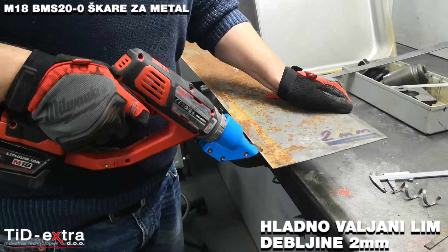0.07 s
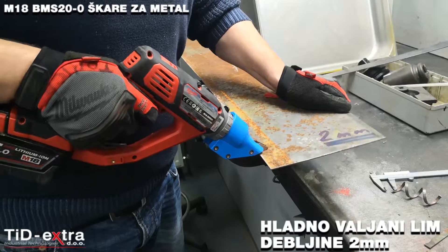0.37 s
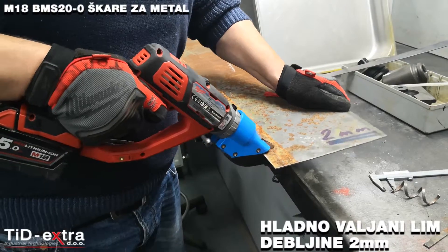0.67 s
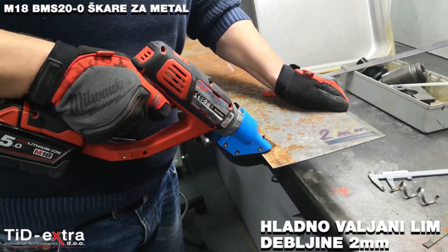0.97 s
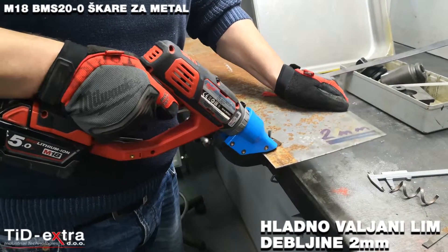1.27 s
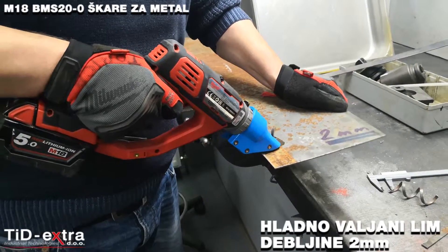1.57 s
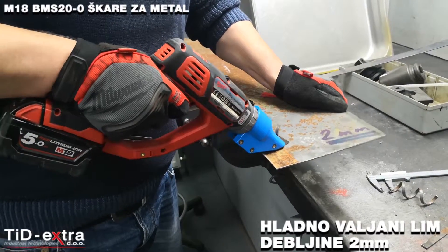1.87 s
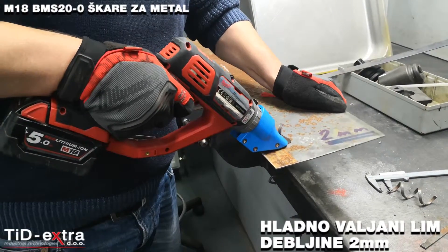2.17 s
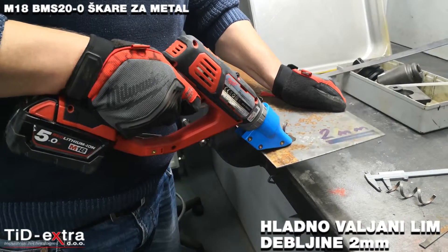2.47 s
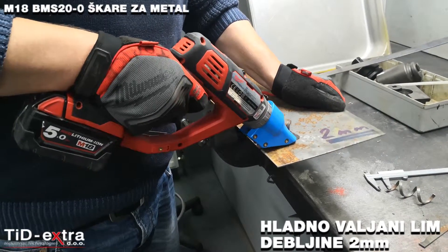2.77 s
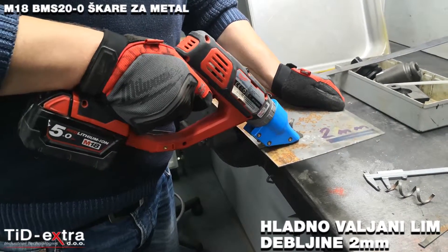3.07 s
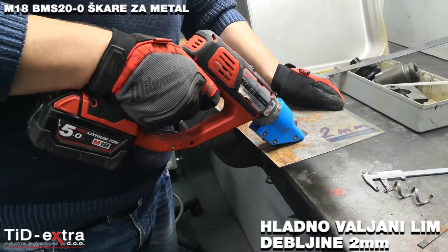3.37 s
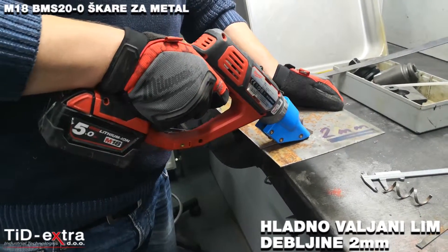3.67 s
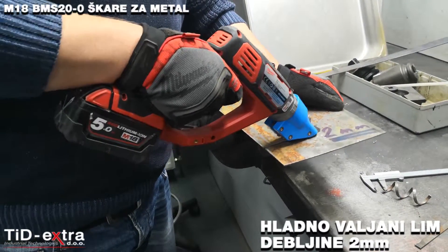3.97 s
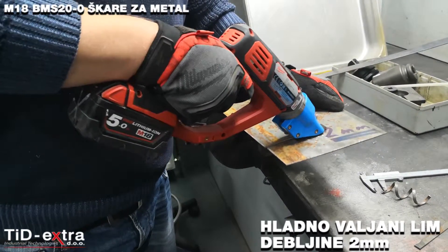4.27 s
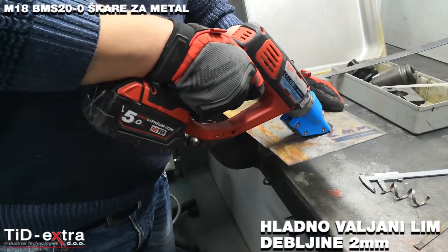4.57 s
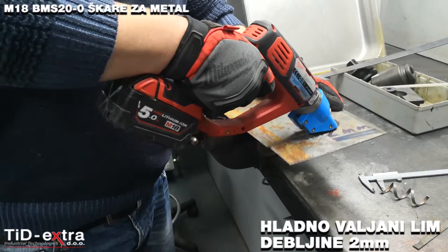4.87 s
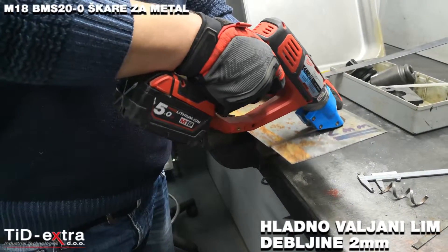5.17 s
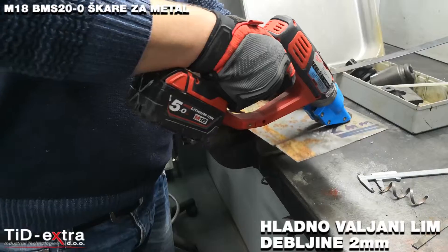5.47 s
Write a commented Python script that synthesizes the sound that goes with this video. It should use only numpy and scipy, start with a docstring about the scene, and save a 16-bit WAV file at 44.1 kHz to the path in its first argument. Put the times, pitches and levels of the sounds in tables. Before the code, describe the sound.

An electric shear chatters rapidly through sheet steel, its motor buzzing while the metal rings, scrapes and briefly squeaks.

```python
"""A cordless shear cuts a steel sheet on a workbench, biting about 37 times a second.
Each bite is an impulse: a chirp, a snap and a crunch that set the blade and the sheet's modes ringing.
Between bites the gears rattle and the cut edge grinds along the jaws; the bench hums in forced vibration.
Now and then a hard bite thumps or the binding steel squeaks. Near the end the tool leans on the sheet,
which growls and drones. The workshop adds a short reverberation."""
import sys
import numpy as np
from scipy import signal
from scipy.fft import rfft, irfft, next_fast_len
from scipy.io import wavfile
from scipy.ndimage import map_coordinates

SR = 44100
rng = np.random.default_rng(int(sys.argv[2]) if len(sys.argv) > 2 else 0)


def file_out(sig):
    """Save sig as 16-bit WAV at sys.argv[1]."""
    # one column per channel
    cols = np.atleast_2d(sig).T
    # limit, then scale
    lim = np.clip(cols, -1, 1)
    pcm = np.round(lim * 32767).astype(np.int16)
    wavfile.write(sys.argv[1], SR, pcm)


N = 243431

# the motor, once spun up, sags and recovers with the steel's resistance: (time [s], stroke rate [Hz])
STROKE_RATE = [(0.18, 35.57), (0.57, 37.98), (1.13, 38.3), (1.21, 37.07), (1.42, 38.5), (1.53, 37.52),
               (1.72, 38.67), (2.49, 37.49), (2.57, 38.13), (3.15, 38.72), (3.32, 35.06), (3.45, 37.09),
               (3.76, 38.03), (3.99, 37.12), (4.39, 37.88), (4.55, 36.59), (5.5, 36.84)]
# how hard the tool is pushed: (time [s], level [dB], emphasis of the bites [dB])
LOAD = [(.14, -20.5, -2.5), (.6, -19.5, 0), (1.4, -19, 1), (2.3, -19.5, 1), (2.65, -18.5, 2),
        (3.05, -19, 2), (3.55, -18.5, 3.5), (3.95, -18.5, 4.5), (4.4, -19.5, 1.5), (4.6, -19, 2),
        (5.15, -17.5, 0), (5.45, -19, 0)]
# the jaws bind and grind louder: (start [s], end [s], gain [dB])
BINDS = [(0.12, 0.173, 3.5), (3.677, 3.755, 2), (4.076, 4.105, 2), (4.236, 4.326, 1.2), (4.74, 4.948, 0.5),
         (5.097, 5.264, 0.8)]
# broad resonances of the cutting head: (frequency [Hz], bandwidth [Hz], gain [dB])
HEAD_MODES = [(1906, 800, 7), (3826, 310, 5), (4735, 440, 5.5), (5596, 630, 7.5), (7060, 930, 7.5)]
# modes of the sheet: (frequency [Hz], bandwidth [Hz], early level [dB], midway level [dB], late level [dB])
SHEET_MODES = [(624, 17, -0.5, -6, -16), (689, 5.7, -11, -10, 0), (813, 8.4, 1.5, -2, 1),
               (865.5, 15, -0.5, -2, -2), (1034, 25, -13, -21, -1), (1092, 15, -19, -11, 6),
               (1836, 13, -1.5, 2, 2.5), (1935, 22, 12, 13, -4), (2022, 14.4, 1, 9, 13),
               (2044, 26, 6, 12, -2.5), (2129, 16, -4, 8, 12.5), (2355, 64, -4, 6.5, -6),
               (2470, 64, 3.5, 3, -1), (2704, 17, 10.5, 6, 9.5), (3480, 150, -24, -1.5, 4),
               (3820, 26, 9, 10, -7), (5060, 42, -13, -4, -4)]
# the early, midway and late stages of the cut: (time [s])
CUT_STAGES = (1.4, 3.0, 4.4)
# resonances of the bench: (frequency [Hz], bandwidth [Hz], gain [dB])
BENCH_MODES = [(200.5, 16, 6), (272, 28, 3.5)]
# partials of the shaking tool: (multiple of the stroke rate) and (level [dB])
SHAKE_HARMONICS = (2, 3, 4)
SHAKE_LEVELS = (-41, -43, -45.5)
# swells of the shaking: (time [s], multiple of the stroke rate, half width [s], peak level [dB])
BUCKS = [(.32, 2, 0.059, -26.5), (0.545, 2, 0.081, -32), (0.825, 3, 0.071, -33), (1.107, 2, 0.052, -32.5),
         (2.72, 3, 0.16, -45), (3.208, 2, 0.089, -37), (3.407, 2, 0.081, -30), (3.58, 3, 0.085, -37),
         (3.95, 5, 0.39, -34.5), (4.648, 2, 0.079, -39), (5.11, 3, 0.11, -39)]
# strength of the chirp before each bite: (time [s], peak level [dB])
CHIRP_LEVELS = [(.14, -38), (.185, -24), (.23, -27), (.6, -24), (.85, -26), (1.6, -22), (2.9, -22),
                (3.12, -24), (3.3, -15.5), (3.6, -22), (3.8, -24), (4.4, -22), (4.75, -18), (5.15, -19.5),
                (5.45, -19.5)]
# partials of the struck blade: (frequency [Hz], relative level [dB])
BLADE_MODES = [(2050, -1.5), (3500, -12), (5000, 0), (7100, 0)]
# the blade rebounds in its guide: (delay after the snap [s], relative level [dB])
REBOUNDS = [(.0022, -9), (.007, -10), (.0115, -13)]
# the steel squeaks on the blade: (time [s], relative level [dB])
SQUEAKS = [(0.1217, -7.5), (0.1906, -6.5), (0.2756, -8.5), (1.57, -16), (2.409, -15.5), (2.595, -15),
           (2.648, -23), (2.674, -18), (2.805, -13), (2.856, -12), (2.881, -24), (3.275, -16), (3.656, -22),
           (3.6825, -17), (3.736, -18), (4.0811, -18), (4.781, -15)]
# hard bites, a low thump after which the level dips briefly: (time [s], thump level [dB], dip scale [dB])
HARD_BITES = [(0.2199, -17, 0), (0.248, -14, -0.5), (0.94, -16.5, 2), (1.121, -16, 0), (1.492, -10.5, 8.5),
              (1.519, -12.5, 3.5), (1.753, -14.5, 0.5), (1.937, -11, 3), (2.197, -14, 2),
              (2.251, -11.5, 0.5), (2.384, -12, 10), (2.464, -16, 2), (2.674, -18, 2.5), (3.014, -11, 1),
              (3.789, -13.5, 5.5), (3.897, -7.5, -0.5), (4.003, -17.5, 0.5), (4.109, -10, 11.5),
              (4.137, -12.5, -3), (4.348, -17, 4.5), (4.972, -19, 4.5), (5.137, -22, 2.5),
              (5.19, -15.5, 0.5), (5.299, -9, 4.5)]
# the binding steel squeals: (time [s], half width [s], frequency [Hz], peak level [dB])
SQUEALS = [(3.325, .05, 5080, -22), (3.738, .003, 4950, -10)]
# partials of the leaned-on sheet: (multiple of the stroke rate) and (level [dB])
DRONE_HARMONICS = (4, 5, 7, 8, 11, 22)
DRONE_LEVELS = (-41, -50, -39.5, -41.5, -48.5, -46)
# spectral envelopes of the sources: (frequency [Hz], relative spectral density [dB])
GEAR_SPECTRUM = [(100, -5.5), (300, -6.5), (500, -12.5), (900, -1.5), (1500, -4), (3000, 2.5), (4300, -2),
                 (6300, -3.5), (7800, 1), (8500, -12), (10000, -18), (11000, -13), (15000, -14)]
HUM_SPECTRUM = [(20, -22), (60, -5.5), (115, -3), (180, -0.5), (290, -6.5), (480, -21), (800, -10),
                (1400, -49), (3000, -100)]
RUMBLE_SPECTRUM = [(8, -18), (20, -9), (40, -6.5), (150, -3.5), (400, -13.5), (2000, -88.5)]
BITE_SPECTRUM = [(100, -11), (520, -20), (900, 4.5), (1500, 6), (3000, -4), (4200, 6.5), (4900, 12),
                 (6300, -2), (7800, 5), (8500, -13), (10000, -14), (11000, -3), (15000, -7)]
SNAP_SPECTRUM = [(100, -21), (500, -18.5), (900, -9), (1400, -3), (2000, 6.5), (2600, 1), (3400, -20.5),
                 (6000, -26.5), (15000, -32.5)]
SQUEAK_SPECTRUM = [(500, -17), (1800, 13), (3800, -4), (4900, 7), (6200, 9.5), (7300, 12.5), (8500, -3),
                   (15000, -52)]
GROWL_SPECTRUM = [(150, -22), (270, -6), (380, -9.5), (550, -3), (800, -3), (1150, 7), (1500, -15),
                  (2500, -14)]
# decay of the workshop: (frequency [Hz], reverberation time [s])
ROOM_T60 = [(200, 0.012), (2000, 0.32), (12000, 0.14)]
# width of the sound field: (frequency [Hz], side over mid [dB])
STEREO_WIDTH = [(50, -13), (110, -10), (200, -5), (380, 0), (700, 1), (1300, -2.5), (2400, -1), (4400, 0)]
# balance between the channels: (time [s], left over right [dB])
BALANCE = [(0, 0.5), (2, 0.8), (2.8, -0.5), (5.5, -0.5)]

SWITCH_ON_S, SPIN_UP_S, FIRST_BITE_S = 0.068, 0.108, 0.122
BITE_SIDE_DB, RATTLE_SIDE_DB = -4, 1  # bites arrive straight from the blade, the rattle from all around
TIME = np.arange(N) / SR
FFT_SIZE = 2 * next_fast_len(N // 2 + SR // 4)


def amp(db):
    """Amplitude ratio of a level in decibels."""
    return 10 ** (np.asarray(db) / 20)


def unit(x):
    """Normalisation to an rms of 1."""
    return x / np.sqrt(np.mean(x ** 2) + 1e-20)


def along(points, hz):
    """Interpolation of (frequency [Hz], value) points on a logarithmic axis."""
    f, v = np.transpose(points)
    return np.interp(np.log(hz + 1), np.log(f + 1), v)


def curves(rows):
    """Linear interpolation, sample by sample, of each column after the time."""
    times, *columns = np.transpose(rows)
    return [np.interp(TIME, times, column) for column in columns]


def wobble(rate):
    """Smooth random modulation with rate knots a second."""
    return map_coordinates(rng.standard_normal(int(N * rate / SR) + 4), [np.arange(N) * rate / SR])


def bell(offset, width):
    """Gaussian envelope, down to 1/e at an offset of one width."""
    return np.exp(-(offset / width) ** 2)


def held(start, end, edge_s):
    """Trapezoidal gate, open from start to end."""
    return np.clip(np.minimum(TIME - start, end - TIME) / edge_s + .5, 0, 1)


def switched_on(rise_s):
    """Linear ramp from 0 to 1, beginning at switch-on."""
    return np.clip((TIME - SWITCH_ON_S) / rise_s, 0, 1)


def filtered(x, response):
    """Linear filtering: the spectrum of x times a complex frequency response."""
    return irfft(rfft(x, FFT_SIZE) * response(np.fft.rfftfreq(FFT_SIZE, 1 / SR)), FFT_SIZE)[..., :N]


def band(x, gains):
    """Zero-phase filtering by (frequency [Hz], linear gain) points."""
    return filtered(x, lambda hz: along(gains, hz))


def coloured(x, spectrum, resonances=()):
    """Minimum-phase filtering by a spectral envelope with resonance peaks on top."""
    def response(hz):
        peaks_db = sum(db / (1 + (2 * (hz - centre) / width) ** 2) for centre, width, db in resonances)
        cepstrum = irfft(np.log(amp(along(spectrum, hz) + peaks_db)))
        half = len(cepstrum) // 2
        return np.exp(rfft(cepstrum * np.r_[1, np.full(half - 1, 2), np.zeros(half)]))
    return filtered(x, response)


def whitened(bursts):
    """Whitening: each burst keeps its phases and takes a flat magnitude spectrum."""
    return irfft(np.exp(1j * np.angle(rfft(bursts))), bursts.shape[-1])


def stereo(pair, side_db=0, echoed=0.51):
    """Decorrelation: reflections off the bench top widen the treble; the bass stays nearly central."""
    t = np.arange(SR // 50) / SR
    reflections = whitened(rng.standard_normal(len(t)) * np.exp(-t / 0.0014))
    reflections *= np.hanning(2 * len(t))[len(t):]
    echo = signal.fftconvolve(pair[0], reflections / np.linalg.norm(reflections))[:N]
    wide = np.sqrt(1 - echoed) * pair[1] + np.sqrt(echoed) * echo
    mid = filtered(pair[0], lambda hz: 1 / np.hypot(1, amp(along(STEREO_WIDTH, hz))))
    side = amp(side_db) * filtered(wide, lambda hz: 1 / np.hypot(1, amp(-along(STEREO_WIDTH, hz))))
    return unit(np.array([mid + side, mid - side]))


def strikes(times, sizes, length_s, alike):
    """Impacts as two channels of broadband bursts; in the first, the share alike is a pure impulse."""
    t = np.arange(SR // 100) / SR
    grain = np.sqrt([[[1 - alike]], [[1]]]) * rng.standard_normal((2, len(times), len(t)))
    envelope = t / length_s * np.exp(-t / length_s)
    bursts = grain * envelope / np.linalg.norm(envelope)
    bursts[0, :, envelope.argmax()] += np.sqrt(alike)
    bursts = whitened(bursts) * bell(t, 10 * length_s)
    starts = np.round(np.clip(times, 0, None) * SR).astype(int)
    samples = (starts[:, None] + np.arange(len(t))).ravel()
    return np.array([np.bincount(samples, (c * sizes[:, None]).ravel(), N)[:N] for c in bursts])


def roughness(turns, drift, fresh, size=1200):
    """Quasi-periodic noise: a drifting profile recurs each stroke; the share fresh is always new."""
    profiles = rng.standard_normal((2, 64, size))
    place = [TIME * drift, turns % 1 * size]
    recurring = unit(np.array([map_coordinates(p, place, order=1, mode="grid-wrap") for p in profiles]))
    return np.sqrt(1 - fresh) * recurring + np.sqrt(fresh) * rng.standard_normal((2, N))


def crank():
    """Phase is the integral of rate: blade strokes counted from the first bite."""
    turns = np.cumsum(curves(STROKE_RATE)[0] * switched_on(SPIN_UP_S)) / SR
    return turns - turns[round(FIRST_BITE_S * SR)]


def bite_times(turns):
    """One bite falls on each whole turn of the crank."""
    return np.interp(np.arange(int(turns[-1]) + 1), turns, TIME)


def gear_teeth(turns, count, uneven_db, scatter_db, jitter_s):
    """Periodic impacts: the teeth knock in an uneven pattern that recurs with every stroke."""
    strokes = np.arange(-1, int(turns[-1]) + 1)[:, None]
    place = (np.arange(count) + rng.random(count)) / count
    times = np.interp((strokes + place).ravel(), turns, TIME, right=N / SR)
    tooth_db = uneven_db * rng.standard_normal(count)
    sizes = amp(tooth_db + scatter_db * rng.standard_normal((len(strokes), count))).ravel()
    times += jitter_s * rng.standard_normal(len(times))
    return unit(strikes(times, sizes, length_s=.0003, alike=0.35))


def grinding(turns, rough_db, swing_db):
    """Sliding friction: the cut edge scrapes along the jaws, most in the first half of each stroke."""
    drag_db = swing_db * np.sin(2 * np.pi * turns) + rough_db * wobble(900)
    return unit(roughness(turns, drift=3.055, fresh=0.89) * amp(drag_db))


def hush(turns, depth_db, lead_strokes, width_strokes):
    """Amplitude modulation: the rattle eases while the blade presses on the steel before each bite."""
    offset = (turns + lead_strokes + .5) % 1 - .5
    return amp(-depth_db * bell(offset, width_strokes))


def sheet_ring(force):
    """Modal superposition: the sheet's damped modes trade strength as the cut grows."""
    f = np.fft.rfftfreq(FFT_SIZE, 1 / SR)
    modes = np.array([(-1) ** k * 1j * f * width / (centre ** 2 - f ** 2 + 1j * f * width)
                      for k, (centre, width, *_) in enumerate(SHEET_MODES)])
    ring = 0
    for levels_db, stage in zip(np.transpose(SHEET_MODES)[2:], np.eye(len(CUT_STAGES))):
        share = np.interp(TIME, CUT_STAGES, stage)
        ring = ring + share * filtered(force, lambda hz: amp(levels_db) @ modes)
    return unit(ring)


def bench(turns):
    """Forced vibration: tool and bench shake at harmonics of the stroke rate, over a dull rumble."""
    force = roughness(turns, drift=4, fresh=.5)
    hum_db = -36.5 + 0.3 * TIME + 1.3 * wobble(16)  # rises as the jaws travel onto the bench
    hum = amp(hum_db) * stereo(coloured(force, HUM_SPECTRUM, BENCH_MODES))
    shake = sum(amp(db + 0.88 * wobble(5.75)) * np.sin(2 * np.pi * k * turns + 0.21 * wobble(7))
                for k, db in zip(SHAKE_HARMONICS, SHAKE_LEVELS))
    bucks = sum(amp(db) * bell(TIME - at, width) * np.sin(2 * np.pi * k * turns)
                for at, k, width, db in BUCKS)
    rumble = amp(-37) * stereo(coloured(rng.standard_normal((2, N)), RUMBLE_SPECTRUM))
    return hum + shake + bucks + rumble


def workshop(x):
    """Reverberation: reflections from the walls decay exponentially, each frequency at its own rate."""
    hz, t, noise = signal.stft(rng.standard_normal((2, SR // 2)), SR, nperseg=256)
    tail = signal.istft(noise * amp(-60 * t / along(ROOM_T60, hz)[:, None]), SR, nperseg=256)[1]
    tail = np.pad(tail / np.linalg.norm(tail[0]), ((0, 0), (SR // 200, 0)))  # 5 ms of travel
    return signal.fftconvolve(x, tail, axes=1)[:, :N]


def gear_whirr(turns, harmonic, at_s, width_s):
    """Swept excitation: at spin-up the gear-mesh tone rises briefly through the head's resonances."""
    swell = amp(-22.5) * bell(TIME - at_s, width_s)
    mesh = np.sin(2 * np.pi * harmonic * turns + 1.3 * wobble(700))
    return coloured(swell * mesh, GEAR_SPECTRUM, HEAD_MODES)


def chirps(turns, pitch_hz, fall_hz_per_s, lead_s, width_s):
    """Friction tone: before each bite the blade slides under rising pressure, and the pitch falls."""
    stroke = np.clip(np.round(turns).astype(int), 0, int(turns[-1]))
    size, detune, early, spread = rng.standard_normal((int(turns[-1]) + 1, 4))[stroke].T
    t = TIME - bite_times(turns)[stroke] + lead_s + .0009 * early
    phase = 2 * np.pi * t * (pitch_hz + 110 * detune - fall_hz_per_s * t / 2) + .45 * wobble(700)
    swell = amp(curves(CHIRP_LEVELS)[0] + 1.3 * size) * bell(t, width_s)
    return swell * np.sin(phase + spread * np.array([[.7], [-.7]]))


def bites(turns, scatter_db, lead_s):
    """Shear fracture: once a stroke the steel gives way in a brief crunch."""
    times = bite_times(turns)
    sizes = amp(scatter_db * rng.standard_normal(len(times)))
    return unit(strikes(times - lead_s, sizes, length_s=0.00048, alike=0.15))


def blade_ring(turns, decay_s, scatter_db, detune):
    """Damped free vibration: every bite sets the blade ringing for a few milliseconds."""
    t = np.arange(SR // 100) / SR
    starts = np.searchsorted(turns, np.arange(int(turns[-1]) + 1)) - round(decay_s * SR)
    ring = 0
    for hz, db in BLADE_MODES:
        size, pitch, phase = rng.standard_normal((len(starts), 3)).T[:, :, None]
        cycles = hz * (1 + detune * pitch) * t + phase / 10
        ring = ring + amp(db + scatter_db * size) * np.sin(2 * np.pi * cycles)
    ring = ring * t / decay_s * np.exp(-t / decay_s)
    samples = (starts[:, None] + np.arange(len(t))).ravel()
    return unit(np.bincount(samples, ring.ravel(), N)[:N])


def snaps(turns, lean, scatter_db, jitter_s):
    """Impact transients: the steel snaps, the blade rebounds, and a leaned-on sheet slaps the jaws."""
    times = bite_times(turns)
    hard = np.abs(times[:, None] - np.array(HARD_BITES)[:, 0]).min(axis=1) < .01
    sizes = amp(scatter_db * rng.standard_normal(len(times)) + 3.5 * hard)

    def tick(delay_s):
        return strikes(times - .0005 + delay_s, sizes, length_s=.00016, alike=.92)

    def loose_tick(delay_s):
        return tick(delay_s + jitter_s * rng.standard_normal(len(times)))

    rebounds = sum(amp(db) * loose_tick(delay_s) for delay_s, db in REBOUNDS)
    snap = tick(0)
    slap = amp(-5) * lean * loose_tick(delay_s=0.011)
    return stereo(coloured(snap + rebounds + slap, SNAP_SPECTRUM), BITE_SIDE_DB)


def squeaks(decay_s, pitch_hz, tone_db):
    """Stick-slip friction of steel on the blade: a bright crunch with a brief tone."""
    t = np.arange(SR // 40) / SR
    envelope = t / decay_s * np.exp(1 - t / decay_s)
    slips = np.zeros((2, N))
    for at, db in SQUEAKS:
        hz = pitch_hz * (1 + 0.086 * rng.standard_normal())
        tone = amp(tone_db) * np.sin(2 * np.pi * (hz * t + rng.random((2, 1))))
        start = round(at * SR)
        slips[:, start:start + len(t)] += amp(db) * envelope * (rng.standard_normal((2, len(t))) + tone)
    return coloured(slips, SQUEAK_SPECTRUM)


def hard_bites(rise_s, recovery_s):
    """Low-frequency transient: a thump, after which the level dips briefly. Gives (thumps, dip [dB])."""
    thumps, dip_db = np.zeros(N), np.zeros(N)
    for at, db, drop_db in HARD_BITES:
        t = np.arange(N - round(at * SR)) / SR
        thumps[-len(t):] += rng.choice([-1, 1]) * amp(db) * t / rise_s * np.exp(1 - t / rise_s)
        dip_db[-len(t):] -= drop_db * (1 - np.exp(-t / rise_s)) * np.exp(-t / recovery_s)
    return filtered(thumps, lambda hz: 1j * hz / (22 + 1j * hz)), dip_db  # high-pass at 22 Hz


def squeals(waver_rad):
    """Friction-excited vibration: the binding steel sounds a brief tone of unsteady pitch."""
    phase = waver_rad * wobble(200) + np.array([[.5], [-.5]])
    return sum(amp(db) * bell(TIME - at, width) * np.sin(2 * np.pi * hz * TIME + phase)
               for at, width, hz, db in SQUEALS)


def growl(turns, swing_db, peak_strokes):
    """Forced bending: the leaned-on sheet flexes roughly in mid-stroke and drones at stroke harmonics."""
    flex = roughness(turns, drift=3, fresh=.45)
    flex = unit(flex * amp(swing_db * np.cos(2 * np.pi * (turns - peak_strokes))))
    drone = sum(amp(db + 3 * wobble(12)) * np.sin(2 * np.pi * k * turns + .5 * wobble(14))
                for k, db in zip(DRONE_HARMONICS, DRONE_LEVELS))
    return amp(-34) * stereo(coloured(flex, GROWL_SPECTRUM)) + drone


def shifting_timbre(metal, lean):
    """Band modulation: the low ring grows under the lean and the bright scrape wavers."""
    low_ring = band(metal, [(450, 0), (700, 1), (1400, 1), (1900, 0)])
    scrape = band(metal, [(5500, 0), (6500, 1)])
    scrape_db = 0.55 - 0.12 * TIME + 0.78 * wobble(17)
    return metal + (amp(-1.77 + 2 * lean) - 1) * low_ring + (amp(scrape_db) - 1) * scrape


def treble_flicker(x, depth_db):
    """Random amplitude modulation: the highest treble flickers in level."""
    treble = band(x, [(8300, 0), (9500, 1)])
    return x + (amp(depth_db * wobble(30)) - 1) * treble


def scene():
    """Superposition: one crank keeps the bites, gears, scraping and hum in step."""
    turns = crank()
    load_db, bite_db = curves(LOAD)
    thumps, dip_db = hard_bites(rise_s=0.0015, recovery_s=0.038)
    level_db = load_db + dip_db + sum(db * held(start, end, edge_s=0.0054) for start, end, db in BINDS)
    lean = held(4.45, 5.38, edge_s=0.1)  # the tool is tipped up and leans on the sheet

    bite = amp(bite_db + 1) * bites(turns, scatter_db=0.5, lead_s=0.000912)
    knocks = gear_teeth(turns, count=26, uneven_db=0.5, scatter_db=2.5, jitter_s=.0001)
    rattle = amp(-9.5) * (knocks + grinding(turns, rough_db=2.5, swing_db=1.7))
    rattle *= hush(turns, depth_db=2, lead_strokes=0.19, width_strokes=0.073)
    blade = np.array([blade_ring(turns, decay_s=.00065, scatter_db=1.1, detune=.035) for _ in range(2)])

    blows = amp(-10) * stereo(coloured(bite, BITE_SPECTRUM, HEAD_MODES), BITE_SIDE_DB)
    blows += amp(-12.5) * stereo(amp(bite_db) * blade)
    blows += amp(-7.5 + bite_db / 4) * snaps(turns, lean, scatter_db=2.5, jitter_s=.0005)
    scratch = stereo(coloured(bite, [(5500, -22), (7200, 8), (9000, -22)]))
    blows += amp(-17) * lean * scratch
    clatter = stereo(coloured(rattle, GEAR_SPECTRUM, HEAD_MODES), RATTLE_SIDE_DB)
    sheet = stereo(sheet_ring(bite + amp(0.5) * rattle))
    metal = shifting_timbre(amp(-0.56) * blows + amp(-0.52) * clatter + amp(-8) * sheet, lean)
    cutting = amp(level_db) * treble_flicker(metal, depth_db=2.1)

    running = switched_on(rise_s=0.062) ** 1.08
    whirr = gear_whirr(turns, harmonic=160, at_s=0.108, width_s=0.013)
    tool = cutting + whirr + squeals(waver_rad=2) + bench(turns) * switched_on(SPIN_UP_S)
    tool = running * tool + lean * growl(turns, swing_db=4, peak_strokes=0.46)
    chirping = chirps(turns, pitch_hz=5193, fall_hz_per_s=70000, lead_s=0.0039, width_s=0.0046)
    tool += running * amp(dip_db) * chirping
    tool += amp(-3) * squeaks(decay_s=0.0008, pitch_hz=5100, tone_db=-8)
    hiss = amp(-91) * rng.standard_normal((2, N))
    balance = amp(curves(BALANCE)[0] * np.array([[.5], [-.5]]))
    return (tool + amp(-8) * workshop(tool) + amp(-1) * thumps + hiss) * balance


def record(dry):
    """Soft saturation rounds the highest peaks; a low-pass filter limits the bandwidth."""
    rounded = dry / (1 + np.abs(dry / 1.05) ** 6) ** (1 / 6)
    return filtered(rounded, lambda hz: hz < 15250)


dry = scene()
out = record(dry)
file_out(out)
```